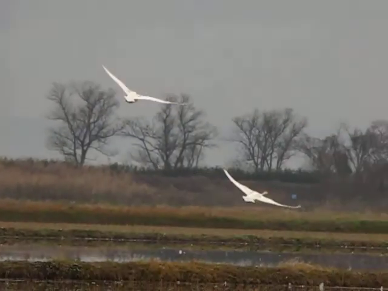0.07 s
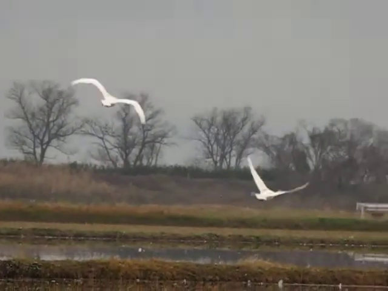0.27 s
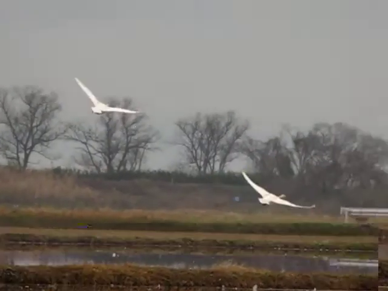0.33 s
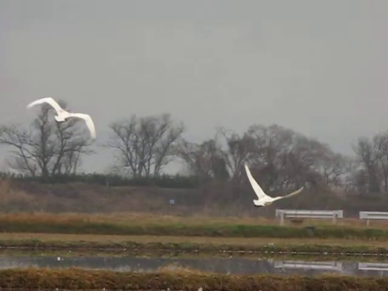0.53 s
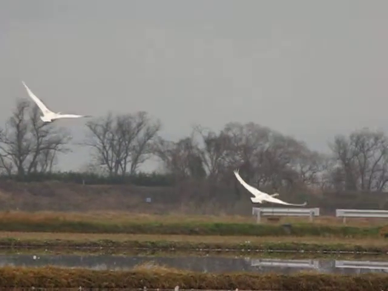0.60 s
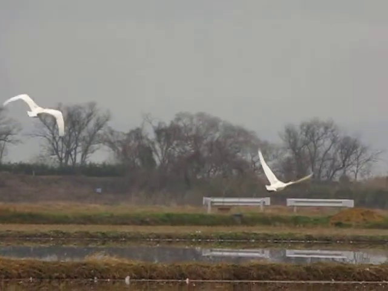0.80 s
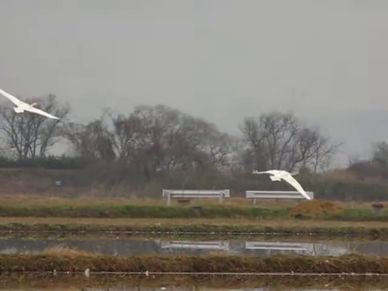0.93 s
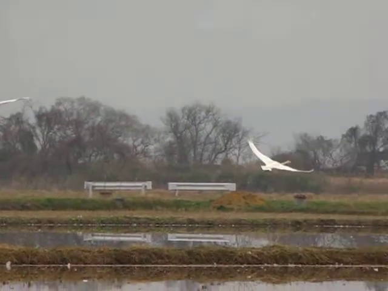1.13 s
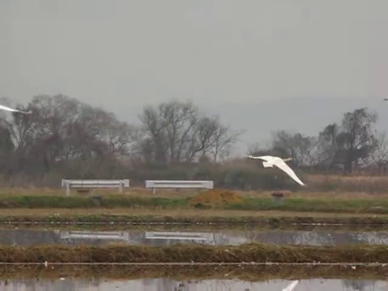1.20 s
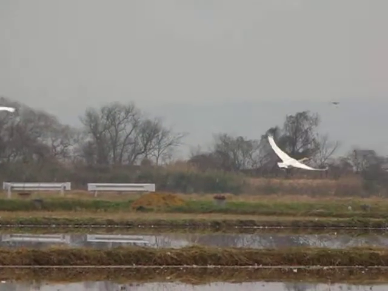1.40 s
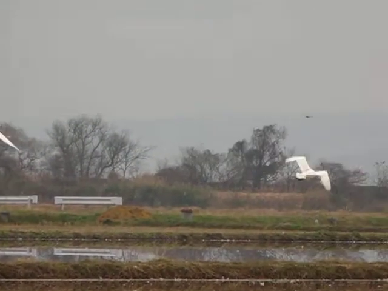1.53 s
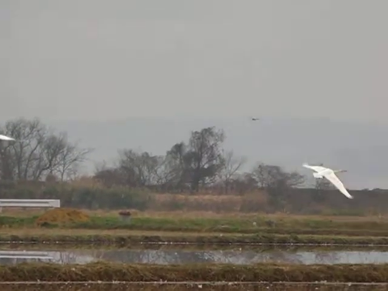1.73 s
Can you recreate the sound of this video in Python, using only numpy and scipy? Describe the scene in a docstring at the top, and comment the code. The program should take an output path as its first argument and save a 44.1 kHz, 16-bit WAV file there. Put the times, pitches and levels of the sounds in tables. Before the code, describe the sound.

Swans give a short high honk, then a low note that breaks upward and turns briefly hoarse. The calls come from the left over open fields, echoing faintly, while distant birds whistle and yelp in light wind.

```python
"""Swans over flooded fields

Swans honk in flight: one short high honk, then a low note that breaks upward and turns briefly hoarse
as strong and weak vibrations alternate. The voice catches roughly as each high note starts, and a line
of trees sends back a faint echo. Far off a bird of prey whistles and trills and other birds yelp and
rasp, over light wind and a low rumble."""
import sys
import numpy as np
from scipy import signal
from scipy.fft import rfft, irfft
from scipy.io import wavfile

SR = 44100
rng = np.random.default_rng(int(sys.argv[2]) if len(sys.argv) > 2 else 0)


def dump(signal):
    """Clip the signal to [-1, 1] and save it as 16-bit WAV at the path in sys.argv[1]."""
    limited = np.clip(np.atleast_2d(signal).T, -1, 1)
    pcm = np.round(limited * 32767).astype(np.int16)
    wavfile.write(sys.argv[1], SR, pcm)


N = 77175
T = np.arange(N) / SR

# swan notes before the throat shapes them: t/s, pitch f/Hz, low-tone level/dB, treble level/dB
CROAKY_START = [(.2155, 700, -24, -32), (.219, 673, -30, -34.5)]
HONK = [(0.224, 804.8, -19, -26.5), (0.244, 801.8, -18.5, -22.5), (0.266, 789, -23, -26),
        (0.286, 762.4, -44, -31.5), (0.302, 730, -35, -62)]
LOW_NOTE = [(0.634, 616, -29, -46.5), (0.674, 623.5, -26, -43.5), (0.698, 630.3, -25, -34.5),
            (0.719, 642, -23, -38.5)]
HIGH_NOTE = [(0.725, 791, -28, -25), (0.735, 812, -23.5, -25), (0.775, 790.3, -25, -32.5),
             (0.795, 784, -36.5, -79), (0.812, 770, -46, -52)]
# rough catches before the throat shapes them: t/s, length/s, f/Hz, low-tone level/dB, treble level/dB
CATCHES = [(0.171, 0.0102, 641, -37.5, -55), (0.2074, 0.0019, 718, -28, -35)]
# how well windpipe and bill pass each frequency: f/Hz, level/dB
THROAT = [(400, -24), (620, -2), (800, -1.5), (1240, -4.5), (1590, -23), (1900, -9.5), (2400, -8.5),
          (2800, -3), (3180, 0.5), (3650, -18), (4000, -16.5), (4750, -35.5), (5600, -28), (7000, -54)]
# how much louder the swans and rasps are on the left: f/Hz, level/dB
LEFT_BOOST = [(630, -0.5), (800, 11.5), (1250, 4), (2400, 6.5), (3150, 8), (4500, 1)]
# the bird of prey's whistle: t/s, centre f/Hz, trill depth/Hz, level/dB
WHISTLE = [(0.038, 2337, 13, -52.5), (.2, 2320, 15, -56), (0.331, 2348, 144, -56.5),
           (0.449, 2345, 172, -56.5), (0.599, 2396, 206, -58), (.88, 2398, 200, -58.5),
           (1.101, 2398, 192, -56), (1.199, 2355, 71, -57.5), (1.39, 2340, 60, -57.5)]
# far yelps: t/s, length/s, start f/Hz, middle f/Hz, end f/Hz, level/dB
YELPS = [(0.586, 0.062, 1350, 1425, 1395, -43.5), (0.773, 0.031, 1340, 1420, 1480, -44.5),
         (1.017, 0.0713, 1383, 1280, 1222, -47), (1.181, 0.037, 1366, 1340, 1290, -50.5),
         (1.31, 0.029, 1270, 1285, 1300, -46.5)]
# faint rasps: t/s, width/s, level/dB
RASPS = [(0.167, 0.01, -42.5), (.622, 0.0075, -47), (1.126, 0.014, -43.5), (1.465, 0.022, -46.5),
         (1.685, 0.049, -51.5)]
# tone colour of the rasps: f/Hz, relative level/dB
RASP_COLOUR = [(500, -13), (1200, 8.5), (1700, -11), (2300, -2), (2950, 2.5), (3400, -3), (4000, -32),
               (8000, -47)]
# wind and rumble, the part both sides share and the part that differs: f/Hz, relative level/dB
WIND_SHARED = [(20, -24), (32, -16), (42, -8), (58, 2.5), (72, 0), (96, -8), (128, -4.5), (175, -6.5),
               (260, -8.5), (420, -12), (650, -13.5), (1020, -12), (1300, -16.5), (1600, -24), (2400, -26),
               (3620, -29.5), (10900, -39), (15500, -45.5)]
WIND_WIDE = [(15, -46), (25, -23), (64, -14), (96, -18), (122, -8), (152, -15.5), (551, -12), (631, -15),
             (996, -2.5), (1660, -17.5), (2840, -17), (3930, -19.5), (15500, -33)]
# gusts that lift the bass: t/s, width/s, rise in level/dB
GUSTS = [(1.46, .03, 4), (1.67, 0.046, 3.5)]


def swans():
    """Two small catches lead into a short honk; then a longer call goes from a low note to a high one."""
    doubling = undb(-5) * bump(at=0.747, width=0.023)  # the hoarse moment
    out = undb(1) * swan_call(CROAKY_START + HONK, bright_db=2.5, break_s=0.218)
    out += undb(-1) * swan_call(LOW_NOTE + HIGH_NOTE, bright_db=-4.5, break_s=0.721, doubling=doubling)
    for start, length, hz, low_db, treble_db in CATCHES:
        catch = swan_voice(hz, low_db, treble_db, top_db=-8, pitch_shake=0.02, level_shake=0.3)
        out += catch * gate(start, start + length, fade_in=0.002, fade_out=0.002)
    return out


def swan_call(rows, bright_db, break_s, doubling=0):
    """One clear call that turns rough at break_s, where the voice jumps to its high range."""
    hz, low_db, treble_db = curves(rows)
    rough = bump(at=break_s, width=0.0045)
    pitch_shake = 0.0032 + 0.022 * rough + 0.0053 * doubling
    level_shake = 0.026 + 0.25 * rough
    # the highest overtones fade faster than the rest of the treble
    top_db = bright_db + 0.45 * (treble_db - treble_db.max())
    sound = swan_voice(hz, low_db, treble_db, top_db, pitch_shake, level_shake, doubling)
    return sound * gate(rows[0][0], rows[-1][0], fade_in=0.0039, fade_out=0.0047)


def swan_voice(hz, low_db, treble_db, top_db, pitch_shake, level_shake, doubling=0):
    """Slightly uneven vibrations and a little rushing air sound through the windpipe and bill."""
    flutter_hz, air_db = 353, -41
    phase = phase_of(hz * (1 + pitch_shake * wander(flutter_hz)))
    out = undb(treble_db + air_db) * noise(THROAT)
    for multiple in np.arange(1, 17) / 2:
        tone_hz = multiple * hz
        treble_share = np.interp(tone_hz, [1180, 2060], [0, 1])
        top_share = np.interp(tone_hz, [4450, 3960], [0, 1])
        source_db = low_db + treble_share * (treble_db - low_db) + top_share * top_db
        gain = undb(source_db + db_at(tone_hz, THROAT))
        if multiple % 1:  # period doubling: strong and weak cycles alternate, adding in-between tones
            gain *= doubling
        out += np.sqrt(2) * gain * np.sin(multiple * phase)
    return out * (1 + level_shake * wander(flutter_hz))


def echoes(sound):
    """The trees scatter back an echo and the open fields add a thin tail."""
    trees = undb(-33) * unit(bump(at=0.153, width=0.016))
    fields = undb(-24) * unit(undb(-60 * T))  # dies away by 60 dB a second
    reflections = (trees + fields) * rng.standard_normal((2, N)) / np.sqrt(N)
    return signal.fftconvolve(sound[None], reflections, axes=1)[:, :N]


def bird_of_prey():
    """A far whistle, held and then trilled; the trill ends quicker and shallower."""
    trill_hz, late_trill_hz, crest_s, quicken_s = 9.03, 11.6, 0.33, 1.105
    centre_hz, depth_hz, db = curves(WHISTLE)
    cycles = trill_hz * (T - crest_s) + (late_trill_hz - trill_hz) * np.maximum(T - quicken_s, 0)
    hz = centre_hz + depth_hz * np.cos(2 * np.pi * cycles) + 12 * wander(61)
    falling = np.maximum(np.sin(2 * np.pi * cycles), 0) * depth_hz / depth_hz.max()
    gain = undb(db - 4.5 * falling + 2 * wander(56))  # quieter on each downward sweep
    tone = np.sqrt(2) * gain * np.sin(phase_of(hz))
    return tone * gate(WHISTLE[0][0], WHISTLE[-1][0], fade_in=0.008, fade_out=0.016)


def yelps():
    """Far waterbirds give short, almost pure notes that bend in pitch."""
    out = 0
    for start, length, first_hz, middle_hz, last_hz, db in YELPS:
        progress = np.clip((T - start) / length, 0, 1)
        bend = np.polyfit([0, 0.5, 1], [first_hz, middle_hz, last_hz], 2)
        hz = np.polyval(bend, progress) * (1 + 0.0066 * wander(156))
        swell = np.sqrt(4 * progress * (1 - progress))
        out += np.sqrt(2) * undb(db) * swell * np.sin(phase_of(hz))
    return out


def rasps():
    """Birds rasp in brief, grainy bursts of noise with no pitch."""
    swell = sum(undb(db) * bump(at, width) for at, width, db in RASPS)
    grainy = noise(RASP_COLOUR) * undb(3.5 * wander(250))
    return swell * unit(grainy)


def wind():
    """Light wind and far rumble: the bass is alike on both sides and swells in gusts, the hiss is wide."""
    shared = undb(-40.5 + 0.3 * wander(6)) * noise(WIND_SHARED)
    bass = signal.sosfiltfilt(signal.butter(2, 600, fs=SR, output="sos"), shared)
    rise_db = sum(db * bump(at, width) for at, width, db in GUSTS)
    shared += (undb(rise_db) - 1) * bass
    wide = undb(-49) * noise(WIND_WIDE)
    return np.array([shared + wide, shared - wide])


def from_left(sound):
    """Sound from the left reaches the right side later and, at most pitches, weaker."""
    lag_s = 0.00007
    hz = np.fft.rfftfreq(N, 1 / SR)
    left_gain = undb(db_at(hz, LEFT_BOOST))
    right_delay = np.exp(-2j * np.pi * hz * lag_s)
    return irfft(rfft(sound) * np.array([left_gain, right_delay]) * 2 / (1 + left_gain), N)


def pan(sound, left_db):
    """Make a sound left_db louder on the left than on the right."""
    return sound * undb(np.array([[left_db], [-left_db]]) / 2)


def undb(db):
    """Turn decibels into a number to multiply by."""
    return 10 ** (np.asarray(db) / 20)


def unit(x):
    """Scale to an average strength (rms) of 1."""
    return x / np.sqrt(np.mean(x ** 2))


def db_at(hz, points):
    """Look up the level at a frequency in a table of f/Hz, level/dB."""
    f, db = np.array(points, float).T
    return np.interp(np.log(np.maximum(hz, 1)), np.log(f), db)


def curves(rows):
    """Join timed rows with straight lines: one curve for each column after the time."""
    times, *columns = np.array(rows, float).T
    return [np.interp(T, times, column) for column in columns]


def noise(colour):
    """Noise of strength 1 with the given tone colour."""
    gain = undb(db_at(np.fft.rfftfreq(N, 1 / SR), colour))
    return unit(irfft(rfft(rng.standard_normal(N)) * gain, N))


def wander(hz):
    """A smooth random wobble of strength 1, up to about the given rate."""
    gain = np.exp(-(np.fft.rfftfreq(N, 1 / SR) / hz) ** 2)
    return unit(irfft(rfft(rng.standard_normal(N)) * gain, N))


def bump(at, width):
    """A bell-shaped rise to 1 and back; times in seconds."""
    return np.exp(-((T - at) / width) ** 2)


def gate(start, end, fade_in, fade_out):
    """Fully on from start to end, with soft fades outside; times in seconds."""
    ramp = np.minimum((T - start) / fade_in, (end - T) / fade_out) + 1
    return np.sin(np.pi / 2 * np.clip(ramp, 0, 1)) ** 2


def phase_of(hz):
    """How far a vibration has turned as its pitch changes, in radians."""
    return 2 * np.pi * np.cumsum(hz) / SR


def scene():
    """Swans and their echo in front of the far birds and the wind."""
    calls = swans()
    out = from_left(calls + rasps()) + echoes(calls)
    out += pan(bird_of_prey(), left_db=4.5) + pan(yelps(), left_db=2.5)
    return out + wind()


def record(dry):
    """Cut away the very highest treble."""
    top_hz = 15550
    return signal.sosfilt(signal.ellip(12, 0.1, 90, top_hz, fs=SR, output="sos"), dry)


dry = scene()
out = record(dry)
dump(out)
```